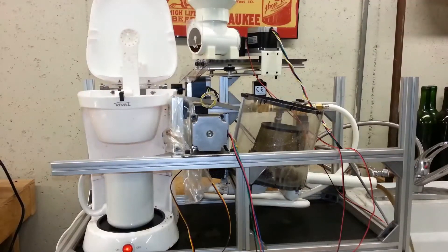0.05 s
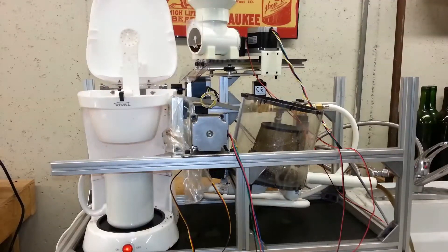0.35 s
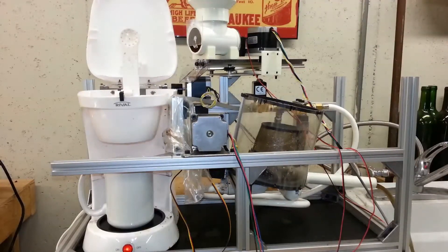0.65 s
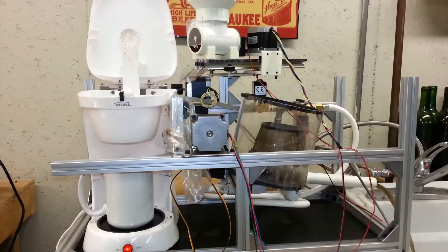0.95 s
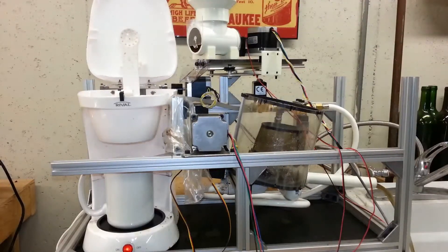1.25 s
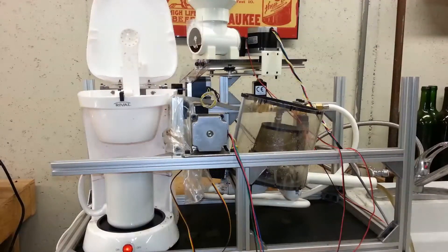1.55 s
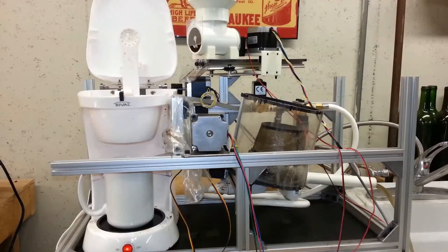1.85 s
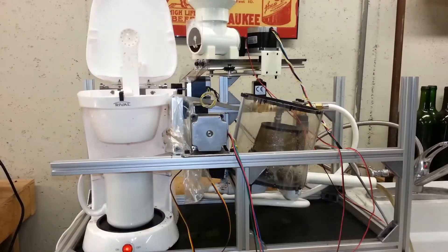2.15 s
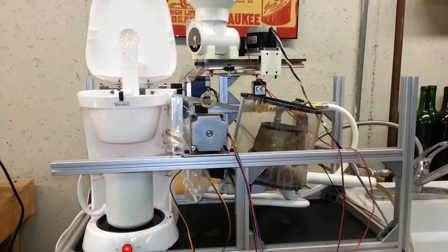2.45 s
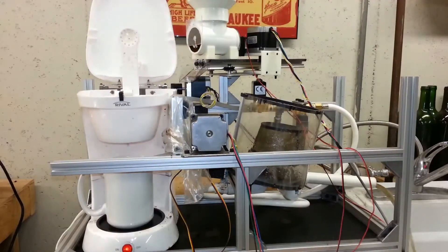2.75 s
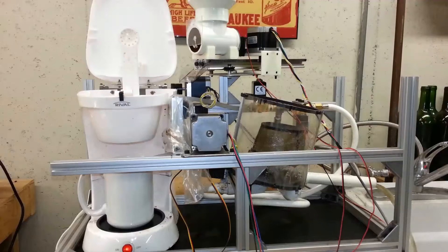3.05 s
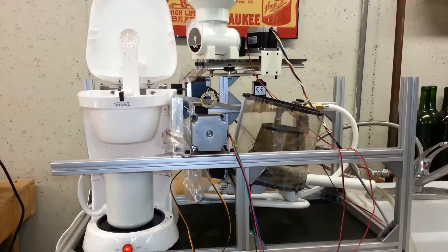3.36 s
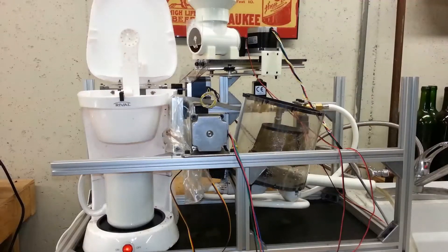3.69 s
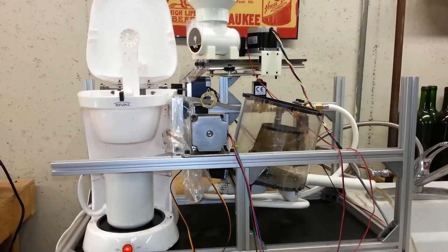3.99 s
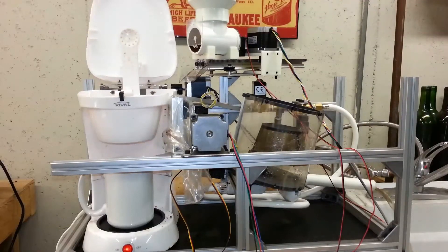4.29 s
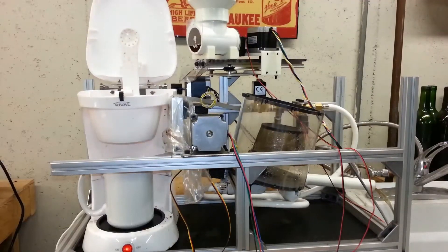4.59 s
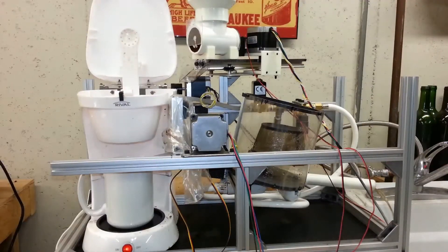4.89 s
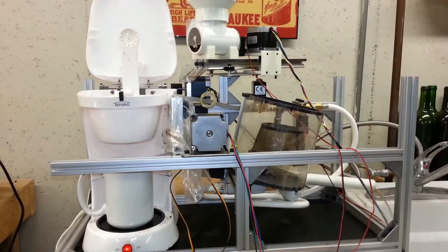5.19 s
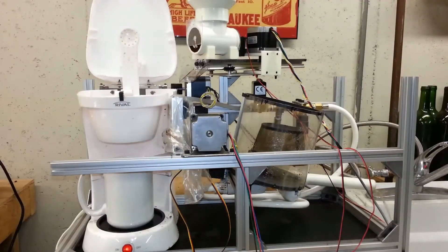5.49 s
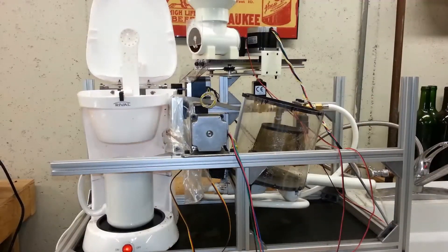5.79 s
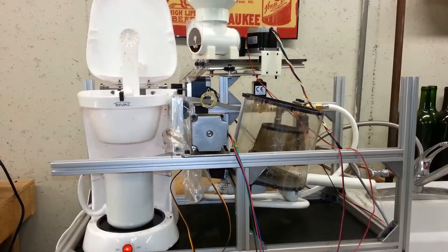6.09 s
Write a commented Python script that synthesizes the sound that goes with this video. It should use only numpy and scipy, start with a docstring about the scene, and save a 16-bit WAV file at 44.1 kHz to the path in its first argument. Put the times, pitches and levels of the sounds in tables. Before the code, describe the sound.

A loud jet of water drums into the hollow plastic tank of a coffee machine. About halfway through, a valve snaps shut and the flow ends with a low gulp. Much quieter, irregular drips and hose spits follow, with a thin trickle, small bubble pops and brief squeaks of air. A faint, very high whistle lingers from the valve. It is heard close, in stereo, over the low drone of a small workshop.

```python
"""A jet of water drums on the plastic tank of a home-built coffee machine, its drops exciting the tank's
resonances. A solenoid valve snaps shut, and air dragged under by the last of the jet oscillates as a gulp.
The hose then drips, spits and trickles into the tank, where bubbles pop and escaping air squeaks, while
water forced past the closed valve whistles thinly. A small workshop drones steadily underneath."""
import sys
import numpy as np
from scipy import signal
from scipy.fft import rfft, irfft
from scipy.io import wavfile

SR = 44100
rng = np.random.default_rng(int(sys.argv[2]) if len(sys.argv) > 2 else 0)


def transcribe(u):
    """Save the signal u as a 16-bit wav file named by the first command-line argument.

    u: samples, shape (n,) or (channels, n), limited to [-1, 1]; the rate is SR.
    q: integer samples, one column per channel.
    """
    v = np.clip(np.atleast_2d(u).T, -1, 1)
    q = np.round(v * 32767).astype(np.int16)
    wavfile.write(sys.argv[1], SR, q)


N = 279594
T = np.arange(N) / SR
HZ = np.fft.rfftfreq(8192, 1 / SR)
SNAP_S, GULP_S, SHUT_S = 3.126, 3.158, 3.176  # the valve strikes, the water gulps, the flow stops

# Normal modes of the tank under the jet. Each row: frequency in Hz, width in Hz, relative gain in dB.
TANK_MODES = [(150, 30, -32), (205, 45, -24.5), (432, 40, -13), (465, 17, -1.3), (530, 39, -8.0),
              (597, 36, -10.4), (628, 31, 1.6), (670, 32, 0.2), (729, 13, -3.3), (770, 24, -1.9),
              (807, 27, -2.7), (844, 16, -4.8), (914, 29, -6.4), (950, 13, -1.3), (976, 29, -6.2),
              (1068, 53, -3.2), (1303, 49, -16.1), (1433, 176, -13.9), (1833, 39, -15.9), (1918, 38, -5.7),
              (2066, 36, -10.8), (2173, 70, -14.3), (2624, 44, -18.7), (2836, 147, -15.3),
              (2985, 54, -19.4), (3991, 125, -25.9)]
# The broad rush between those modes. Each row: frequency in Hz, relative gain in dB.
RUSH_SPECTRUM = [(70, -59), (130, -66), (330, -28.5), (420, -21.5), (900, -11.5), (1200, -22.5),
                 (2500, -20.5), (3300, -24.5), (4300, -29.5), (5600, -36.5), (14500, -42)]
# Antiresonances, where neighbouring modes cancel. Each entry: frequency in Hz.
ANTIRESONANCES_HZ = [590, 725, 852, 1000, 2314]
# The deeper ring of the empty tank, inverted for the filled one. Each row: frequency in Hz, gain in dB.
EMPTY_TANK_COLOUR = [(300, -1.5), (470, 2.5), (620, 1.5), (780, -1), (1750, -0.5), (1950, 0.9), (2300, 0)]
# Stereo width of the jet. Each row: frequency in Hz, side-to-mid ratio in dB.
JET_WIDTH = [(60, 6), (330, -19), (1000, -9.5), (2340, -3.5), (5800, -0.5)]
# Slugs of water in the jet. Each row: centre in seconds, extra level in dB.
JET_SLUGS = [(0.062, 1.5), (0.15, 2.5), (0.265, 1)]
# The workshop's steady background. Each row: frequency in Hz, relative spectral density in dB.
ROOM_SPECTRUM = [(55, -43), (100, -16.5), (160, -5), (215, -0.5), (450, -0.5), (620, -7), (1200, -10),
                 (6000, -27), (8300, -26), (14500, -28.5)]
# The narrow peak of the drone. Each row: frequency in Hz, width in Hz, relative gain in dB.
DRONE_PEAK = [(206.6, 9.2, 6)]
# Stereo width of the background. Each row: frequency in Hz, side-to-mid ratio in dB.
ROOM_WIDTH = [(30, 12), (130, -9), (300, -9.5), (1400, 0.5), (2500, -0.5)]
# Spectrum of the gulping water. Each row: frequency in Hz, relative gain in dB.
GULP_SPECTRUM = [(25, -46), (60, -17), (100, -8), (145, 4), (230, 2.5), (360, 0.5), (520, 4), (900, -36)]
# The tank floor's mode in the gulp. Each row: frequency in Hz, width in Hz, relative gain in dB.
FLOOR_MODE = [(450, 30, 14.5)]
# Large bubbles breaking away in the gulp. Each row: start in seconds, peak in dB, pitch in Hz.
LARGE_BUBBLES = [(3.157, -35, 215), (3.199, -32, 147.7)]
# Water running down the wall. Each row: time in seconds, level in dB.
TRICKLE_LEVELS = [(3.38, -47), (3.6, -56), (4.16, -53.5), (4.24, -48), (4.42, -51.5), (4.75, -55.5),
                  (5.07, -48), (5.24, -48), (5.5, -58), (6.34, -55.5)]
# Spectrum of that running water. Each row: frequency in Hz, relative gain in dB.
TRICKLE_SPECTRUM = [(300, -4), (600, 1), (1000, -7), (1700, -1), (3300, 5), (4900, 0.5), (6200, -10),
                    (14500, -11.5)]
# The closed valve's whistle. Each row: time in seconds, centre pitch in Hz.
WHISTLE_PITCH = [(3.35, 9800), (3.65, 10100), (4.02, 9760), (4.8, 10220), (5.79, 9900), (5.855, 9560),
                 (5.9, 10130)]
# Spits of spray from the hose. Each row: start in seconds, level in dB.
HOSE_SPITS = [(3.192, -36), (3.6, -48), (4.13, -47), (4.348, -39), (4.383, -41), (4.599, -40), (4.912, -40),
              (5.0973, -36.5), (5.114, -39), (5.2634, -32)]
# Drops landing in the tank. Each row: start in seconds, floor thump level in dB, splash level in dB.
DROP_IMPACTS = [(3.251, -39, -44), (3.349, -35, -37), (3.46, -34.5, -41), (3.609, -33, -45),
                (3.637, -37, -48.5), (3.736, -31.5, -40.5), (3.751, -32, -48), (3.821, -34, -41.5),
                (3.884, -31.5, -40), (3.947, -30.5, -45), (4.046, -49, -41.5), (4.057, -27.5, -37.5),
                (4.194, -30, -39.5), (4.21, -37, -36.5), (4.222, -29.5, -52), (4.364, -29, -36.5),
                (4.391, -27, -38.5), (4.577, -35, -42.5), (4.592, -32.5, -50), (4.755, -33.5, -44),
                (4.774, -37, -41), (4.866, -39, -46), (4.898, -35.5, -43.5), (4.926, -40, -47),
                (5.039, -32, -43), (5.069, -39, -40), (5.204, -40, -40), (5.219, -33.5, -39),
                (5.231, -44, -35.5), (5.38, -31.5, -39.5), (5.411, -43, -41), (5.614, -31.5, -49),
                (5.651, -35, -54), (5.671, -36, -49), (5.725, -39, -50), (5.742, -34.5, -55),
                (5.809, -40, -46.5), (5.846, -39, -51), (5.913, -41, -46), (5.927, -40, -48),
                (5.943, -38, -52), (6.053, -35, -63), (6.085, -33.5, -53), (6.098, -38, -43.5),
                (6.234, -33.5, -40.5), (6.247, -36.5, -47), (6.26, -36, -54), (6.318, -35, -44)]
# Wall modes rung by a drop. Each row: mean frequency in Hz, width in Hz, mean relative gain in dB.
WALL_MODES = [(700, 250, 7), (946, 94, 22), (1206, 117, 20.5), (1520, 150, 14.5), (1990, 130, 14.5),
              (2355, 47, 13.5), (2570, 130, 14.5), (3800, 960, 6)]
# Bubbles bursting at the surface. Each row: start in seconds, level in dB.
BUBBLE_POPS = [(3.2961, -27.5), (3.525, -34), (3.7503, -35.5), (5.1597, -37.5)]
# Air escaping through the water. Each row: start in seconds, level in dB, pitch in Hz, rise in Hz/s.
AIR_SQUEAKS = [(3.354, -43, 2410, 9000), (3.943, -31.5, 3580, 12000), (4.001, -38, 5000, 8000),
               (4.452, -42, 2630, 12000), (4.836, -36, 3805, 40000), (5.064, -40, 2160, 25000),
               (5.223, -35.5, 2504, 8000)]
# Treble balance of the microphones. Each row: frequency in Hz, left boost and equal right cut in dB.
TREBLE_BALANCE = [(2000, 0), (4000, 1.22)]


def amp(db):
    """Amplitude ratio of a level in decibels."""
    return 10 ** (np.asarray(db) / 20)


def unit(x):
    """Normalisation to rms 1."""
    return x / np.sqrt(np.mean(x ** 2) + 1e-20)


def spectrum(points):
    """Gains on the grid HZ, interpolated from (Hz, dB) points in log frequency."""
    hz, db = np.transpose(points)
    return amp(np.interp(np.log(HZ + 1), np.log(hz), db))


def resonances(modes):
    """Gains of (Hz, width, dB) modes summed in power; small panels radiate no deep bass."""
    power = sum(amp(2 * db) / (1 + 2 * ((HZ - hz) / width) ** 2) ** 2 for hz, width, db in modes)
    return np.sqrt(power) * HZ ** 2 / (HZ ** 2 + 150 ** 2)


def colour(x, gain):
    """Minimum-phase filtering: the response is causal, so resonances ring after each blow."""
    log_gain = np.log(np.maximum(gain, 1e-5))
    mirrored = np.concatenate([log_gain, log_gain[-2:0:-1]])
    response = np.exp(np.conj(signal.hilbert(mirrored)))
    taps = np.fft.ifft(response).real[:len(HZ)]
    return signal.oaconvolve(x, taps)[:N]


def curve(rows):
    """Linear interpolation of (seconds, value) rows at every sample."""
    return np.interp(T, *np.transpose(rows))


def ramp(start_s, length_s):
    """A linear rise from 0 to 1."""
    return np.clip((T - start_s) / length_s, 0, 1)


def held(start_s, attack_s, hold_s, fall_db_per_s):
    """An envelope that rises, holds, then decays exponentially."""
    return ramp(start_s, attack_s) * amp(-fall_db_per_s * np.maximum(T - start_s - hold_s, 0))


def add(mix, start_s, sound):
    """Superposition of a sound on the mix, in place."""
    part = mix[max(round(start_s * SR), 0):][:len(sound)]
    part += sound[:len(part)]


def patter(per_s, spread_db):
    """A Poisson process of impacts of uneven size, rms 1."""
    sizes = amp(spread_db * np.minimum(rng.exponential(1, N), 4))
    return unit(sizes * rng.choice([-1, 1], N) * (rng.random(N) < per_s / SR))


def wander(rate_hz):
    """Random fluctuation: low-passed noise, rms 1."""
    hz = np.fft.rfftfreq(N, 1 / SR)
    return unit(irfft(rfft(rng.standard_normal(N)) / (1 + (hz / rate_hz) ** 4), N))


def stereo(mid, side):
    """Left and right as the sum and difference of mid and side."""
    return np.array([mid + side, mid - side])


def from_right(x, delay_samples=5):
    """Path difference: a sound from the right reaches the left microphone late."""
    return np.array([np.pad(x, (delay_samples, 0))[:N], x])


def echoes(x, t60):
    """Reverberation: sparse reflections of random sign fall 60 dB in t60 seconds, at unit energy gain."""
    t = np.arange(SR // 2) / SR
    arrivals = rng.choice([-1, 1], len(t)) * (rng.random(len(t)) < 3000 / SR)
    taps = arrivals * (t > .002) * amp(-60 * t / t60)
    return signal.oaconvolve(x, taps / np.linalg.norm(taps))[:N]


def in_room(x, wet_db, t60):
    """Direct sound plus a diffuse tail that is independent at each microphone."""
    return from_right(x) + amp(wet_db) * np.array([echoes(x, t60), echoes(x, t60)])


def cracks(events, t60, low_hz, high_hz, snap_s, tail_db):
    """Transients at (seconds, dB) decay as crackling hiss, scattered differently to each microphone."""
    out, t = np.zeros((2, N)), np.arange(SR // 5) / SR
    hz = np.fft.rfftfreq(len(t), 1 / SR)
    band = hz ** 4 / (hz ** 4 + low_hz ** 4) / (1 + (hz / high_hz) ** 4)
    envelope = (np.exp(-t / snap_s) + amp(tail_db - 60 * t / t60)) * (1 - np.exp(-t / 0.00078))
    for start_s, db in events:
        for channel in out:
            noise = rng.standard_normal(len(t))
            crackle = unit(irfft(rfft(noise * abs(noise)) * band, len(t)))
            add(channel, start_s, amp(db) * envelope * crackle)
    return out


def water_jet(db=-21, ease_db_per_s=0.33, fall_db_per_s=215, slug_half_s=0.028):
    """Impact excitation: the jet's heavy drops drum the tank's low modes, fine spray fills the treble."""
    notches = [1 - .5 * np.exp(-((HZ / hz - 1) / 0.0048) ** 2) for hz in ANTIRESONANCES_HZ]
    tank = np.hypot(spectrum(RUSH_SPECTRUM), resonances(TANK_MODES)) * np.prod(notches, axis=0)
    heavy_share = 0.54 / (1 + (HZ / 1100) ** 2)
    drops = patter(per_s=380, spread_db=-4)
    spray = patter(per_s=7000, spread_db=-1) * amp(.5 * wander(rate_hz=5))
    drumming = colour(drops, tank * np.sqrt(heavy_share)) + colour(spray, tank * np.sqrt(1 - heavy_share))
    fill = ramp(0, SHUT_S)  # rising water damps the ringing and shifts the drumming upward
    empty = spectrum(EMPTY_TANK_COLOUR)
    mid = (1 - fill) * colour(drumming, empty) + fill * colour(drumming, 1 / empty)
    side = colour(rng.standard_normal(N), tank * spectrum(JET_WIDTH))
    slugs_db = sum(extra_db * np.exp(-((T - s) / slug_half_s) ** 2) for s, extra_db in JET_SLUGS)
    softening_db = ease_db_per_s * T  # the tank fills
    emptying_db = fall_db_per_s * np.maximum(T - SHUT_S - .012, 0)  # the hose runs dry
    return stereo(mid, side) / mid.std() * amp(db + slugs_db - softening_db - emptying_db)


def workshop(db=-47.5):
    """Stationary background noise: a low drone with faint hiss."""
    drone = np.hypot(spectrum(ROOM_SPECTRUM), resonances(DRONE_PEAK))
    mid = colour(rng.standard_normal(N), drone)
    side = colour(rng.standard_normal(N), drone * spectrum(ROOM_WIDTH))
    return amp(db) * stereo(mid, side) / mid.std()


def valve_snap(db=-27):
    """A brief impact has a broad spectrum: the solenoid's plunger strikes its seat."""
    return cracks([(SNAP_S, db)], t60=0.057, low_hz=3030, high_hz=17000, snap_s=0.0039, tail_db=-8)


def gulp(burst_db=-24, churn_db=-40, glug_t60=0.094):
    """Air entrainment: the collapsing jet drags under large bubbles that oscillate; the water churns on."""
    def bubbling(gain):
        """Random impulses drive a resonant body."""
        mid = colour(patter(per_s=330, spread_db=-4), gain)
        side = amp(-15) * colour(rng.standard_normal(N), gain)
        return stereo(mid, side) / mid.std()
    burst = amp(burst_db) * held(GULP_S, attack_s=0.0061, hold_s=0.031, fall_db_per_s=160)
    churn = amp(churn_db) * held(GULP_S, attack_s=0.036, hold_s=0.24, fall_db_per_s=65)
    glugs = sum(amp(db) * held(s, 1 / hz, 6 / hz, 60 / glug_t60) * np.sin(2 * np.pi * hz * (T - s))
                for s, db, hz in LARGE_BUBBLES)
    water = spectrum(GULP_SPECTRUM)
    water_and_floor = np.hypot(water, resonances(FLOOR_MODE))
    return burst * bubbling(water_and_floor) + churn * bubbling(water) + glugs


def trickle(bubble_sizes=28):
    """Bubble resonance: in a thin, crackling run of water, small bubbles rise in pitch as they surface."""
    bubbles, t = np.zeros(N), np.arange(SR // 20) / SR
    for hz in np.geomspace(1300, 7000, bubble_sizes):
        envelope = np.exp(-hz * t / 10) * (1 - np.exp(-t / 0.00068))
        ring = envelope * np.sin(2 * np.pi * hz * t * (1 + 3 * t))
        bubbles += signal.oaconvolve(patter(per_s=12, spread_db=3.5), ring)[:N]
    crackle = patter(per_s=700, spread_db=4) * amp(2 * wander(rate_hz=14))
    water = unit(colour(crackle + amp(-7.5) * unit(bubbles), spectrum(TRICKLE_SPECTRUM)))
    flow = amp(curve(TRICKLE_LEVELS)) * ramp(SHUT_S, length_s=.1)
    return in_room(water * flow, wet_db=-1, t60=.1)


def valve_whistle(width_hz=200, db=-60, lean_left_db=2.5):
    """Flow noise in a narrow, wavering band: mains pressure forces a thread of water past the seat."""
    flutter_hz = 75 * wander(rate_hz=70)
    sway_hz = 38 * wander(rate_hz=7.3)  # the pressure in the hose sways
    phase = 2 * np.pi * np.cumsum(curve(WHISTLE_PITCH) + flutter_hz + sway_hz) / SR
    bands = np.array([unit(wander(width_hz) * np.cos(phase) + wander(width_hz) * np.sin(phase))
                      for _ in range(2)])
    return bands * amp([[db + lean_left_db], [db - lean_left_db]]) * ramp(SHUT_S, length_s=0.059)


def hose_spits():
    """Spray radiates broadband noise: the draining hose spits in short bursts."""
    return cracks(HOSE_SPITS, t60=0.19, low_hz=1770, high_hz=11700, snap_s=0.0012, tail_db=-6.5)


def drips(floor_hz=472, sag_hz_per_s=6, rise_s=0.0008, swing_s=0.014, splash_s=0.0061, slap_share=0.37):
    """Free vibration: each drop sets the tank floor swinging briefly, and its splash rings the walls."""
    floor, walls, t = np.zeros(N), np.zeros(N), np.arange(SR // 16) / SR
    small_count, small_thump_db, small_splash_db = 16, -46.5, -60
    small_drops = [(s, small_thump_db, small_splash_db) for s in rng.uniform(SHUT_S, T[-1], small_count)]
    drops = list(DROP_IMPACTS) + small_drops
    spots = rng.uniform(-1, 1, (len(drops), len(WALL_MODES), 2))  # each landing spot has its own timbre
    slosh = 1 + .09 * wander(rate_hz=200)  # moving water makes the swing uneven
    for (start_s, thump_db, splash_db), spot in zip(drops, spots):
        swing_hz = floor_hz - sag_hz_per_s * (start_s - SHUT_S)
        cycles = np.cumsum(swing_hz * np.roll(slosh, -round(start_s * SR))[:len(t)]) / SR
        envelope = (1 - np.exp(-t / rise_s)) * np.exp(-(t / swing_s) ** 4)
        add(floor, start_s, amp(thump_db) * envelope * np.sin(2 * np.pi * cycles))
        length_s = splash_s * amp(0.32 * (splash_db - small_splash_db))  # big splashes last longer
        # the floor slaps the water once in every swing, hardest the first time
        slaps = np.exp(-(cycles % 1) / slap_share) * (1 + np.exp(-t / rise_s))
        noise = rng.standard_normal(len(t))
        splash = noise * slaps * np.exp(-(t / length_s) ** 4)
        stray_droplets = 0.012 * noise[::-1] ** 3 * np.exp(-t / 0.07)
        modes = [(hz * (1 + .025 * detune), width, db + 4.5 * strength)
                 for (hz, width, db), (detune, strength) in zip(WALL_MODES, spot)]
        rattle = colour(splash + stray_droplets, resonances(modes))
        add(walls, start_s, amp(splash_db) * rattle / rattle[:SR // 50].std())
    thumps = from_right(floor + amp(-12) * echoes(floor, t60=0.22))
    return thumps + in_room(walls, wet_db=-6.5, t60=0.19)


def bubble_pops():
    """Film rupture: bubbles burst at the surface with a short crack."""
    return cracks(BUBBLE_POPS, t60=0.17, low_hz=2840, high_hz=4800, snap_s=0.0022, tail_db=-9)


def air_squeaks(length_s=0.018, wobble_hz=150, attack_s=0.0017):
    """Frequency modulation: air squeezing through water whistles, wobbling upward as bubbles surface."""
    out, t = np.zeros(N), np.arange(SR // 10) / SR
    wobble = wobble_hz * wander(rate_hz=130)
    envelope = np.exp(-(t / length_s) ** 4) * (1 - np.exp(-t / attack_s))
    for start_s, db, hz, rise_hz_per_s in AIR_SQUEAKS:
        pitch_hz = hz + rise_hz_per_s * t + wobble[round(start_s * SR):][:len(t)]
        tone = np.sin(2 * np.pi * np.cumsum(pitch_hz) / SR)
        add(out, start_s, amp(db) * envelope * tone)
    return in_room(out, wet_db=-7, t60=0.27)


def scene():
    """Linear superposition of all sources at the two microphones."""
    filling = water_jet() + valve_snap() + gulp()
    settling = drips() + bubble_pops() + air_squeaks() + hose_spits() + trickle()
    return filling + settling + valve_whistle() + workshop()


def record(dry, cutoff_hz=14550):
    """Frequency response of the microphones: the left hears more treble, and both are band-limited."""
    tilt = spectrum(TREBLE_BALANCE)
    heard = np.array([colour(dry[0], tilt), colour(dry[1], 1 / tilt)])
    lowpass = signal.firwin(401, cutoff_hz, window=("kaiser", 8), fs=SR)
    return signal.oaconvolve(heard, lowpass[None], "same")


dry = scene()
out = record(dry)
transcribe(out)
```